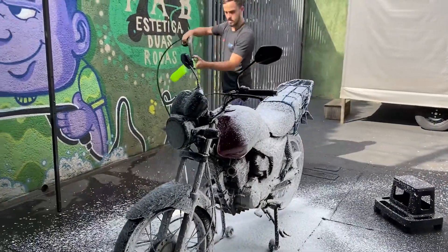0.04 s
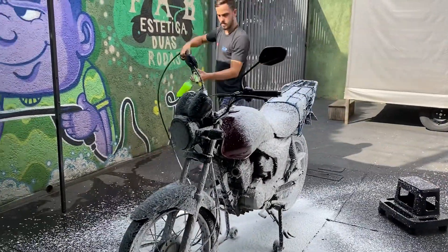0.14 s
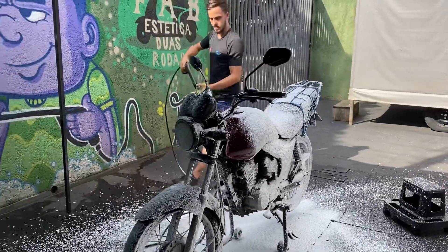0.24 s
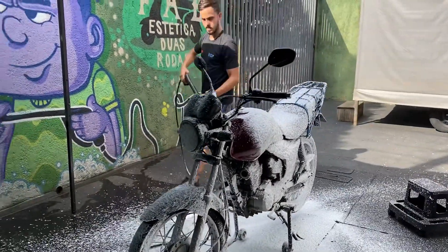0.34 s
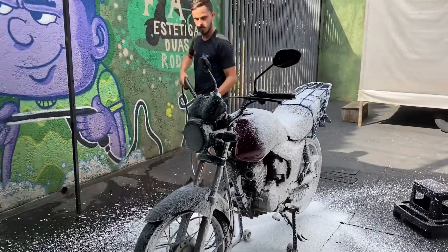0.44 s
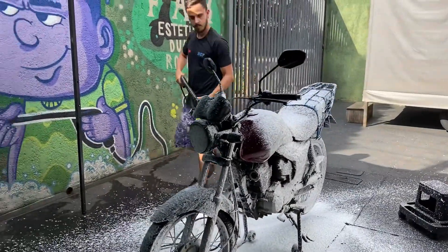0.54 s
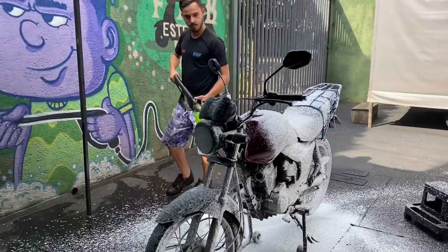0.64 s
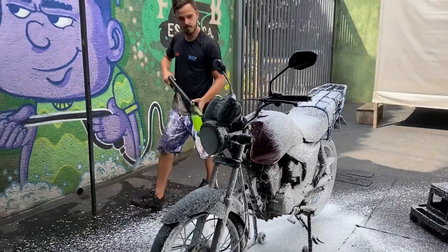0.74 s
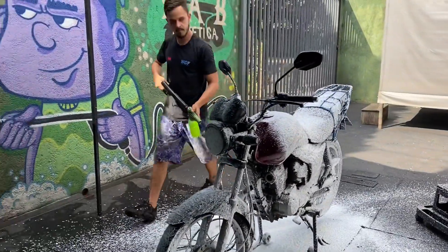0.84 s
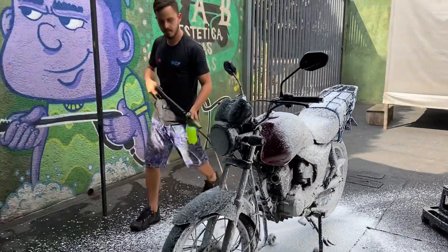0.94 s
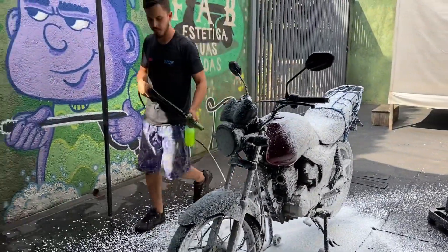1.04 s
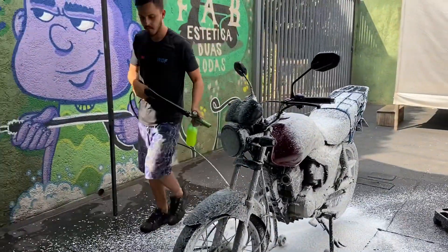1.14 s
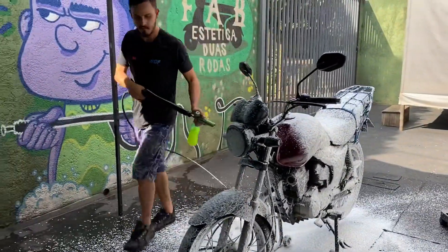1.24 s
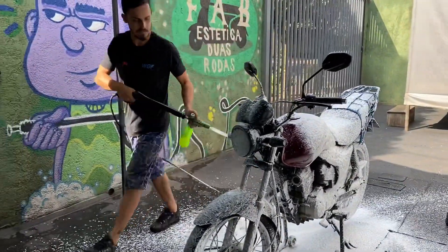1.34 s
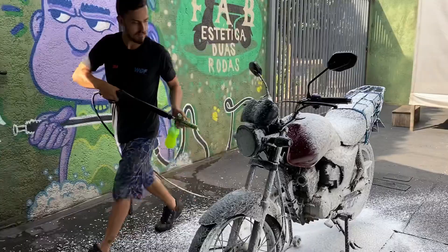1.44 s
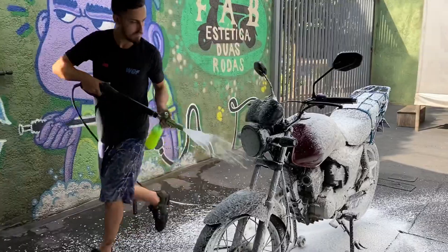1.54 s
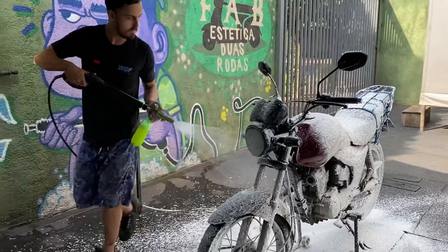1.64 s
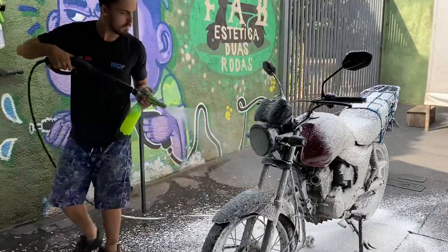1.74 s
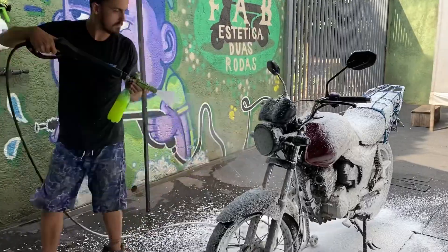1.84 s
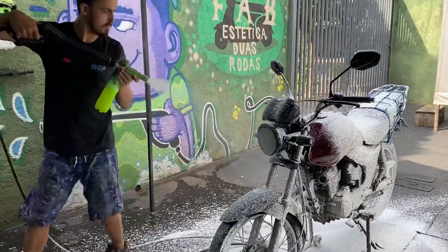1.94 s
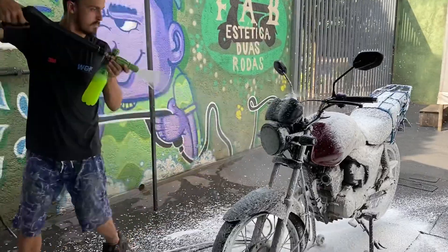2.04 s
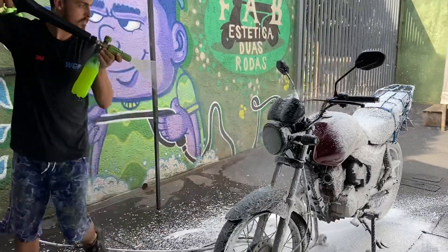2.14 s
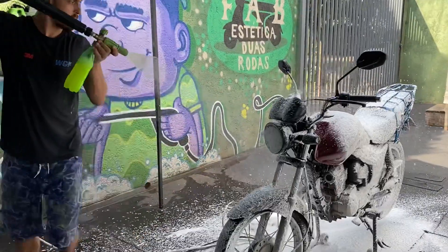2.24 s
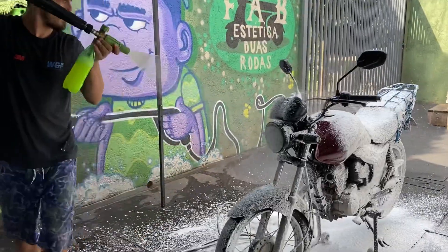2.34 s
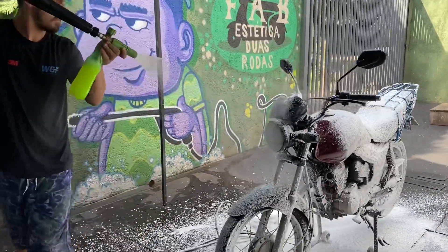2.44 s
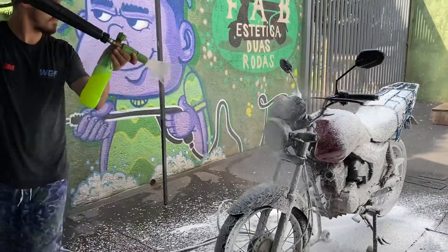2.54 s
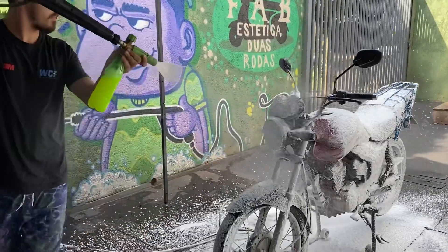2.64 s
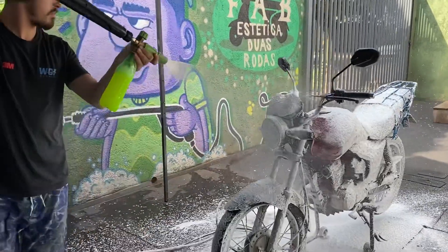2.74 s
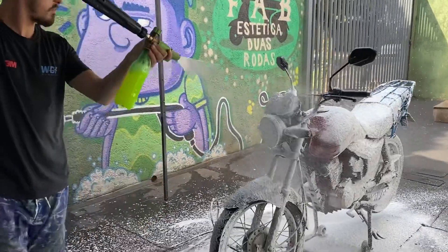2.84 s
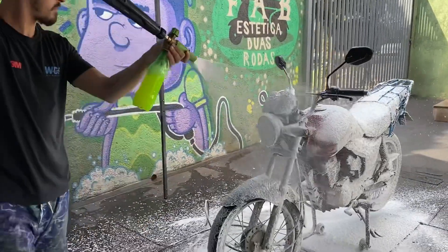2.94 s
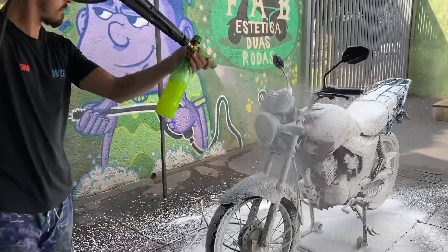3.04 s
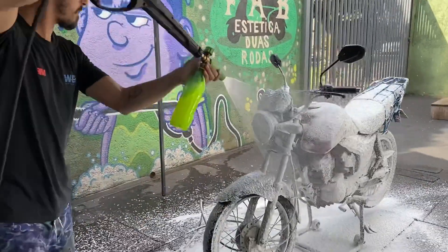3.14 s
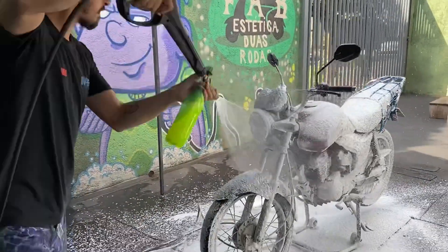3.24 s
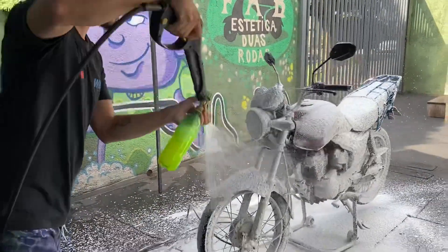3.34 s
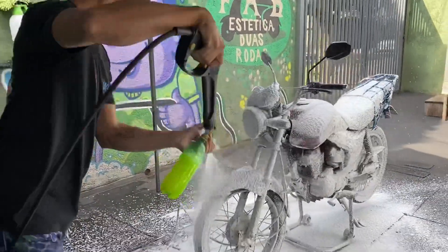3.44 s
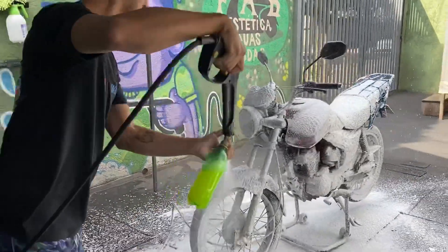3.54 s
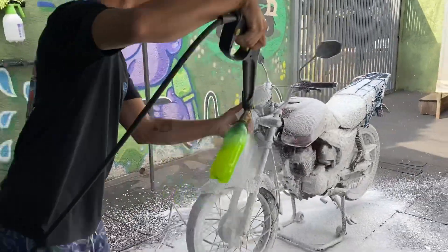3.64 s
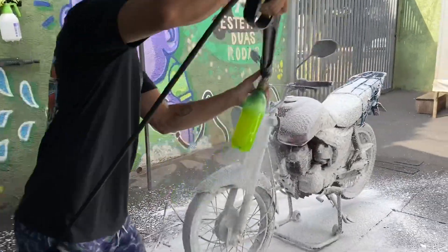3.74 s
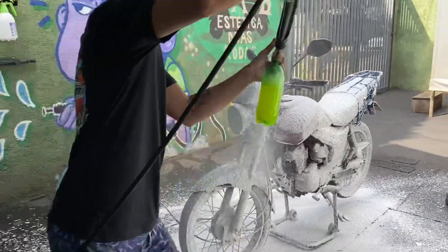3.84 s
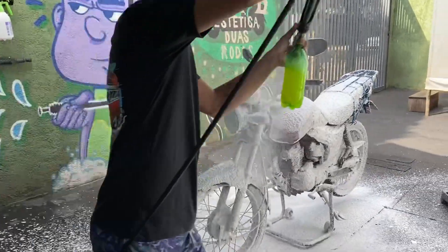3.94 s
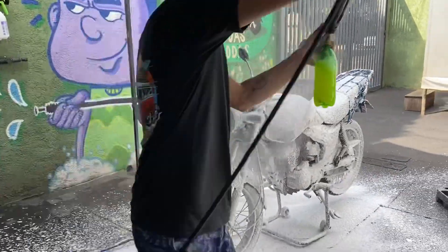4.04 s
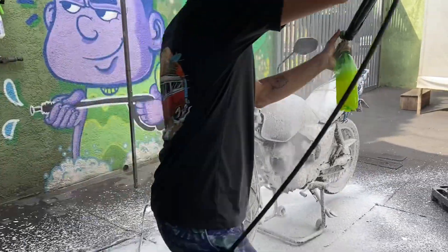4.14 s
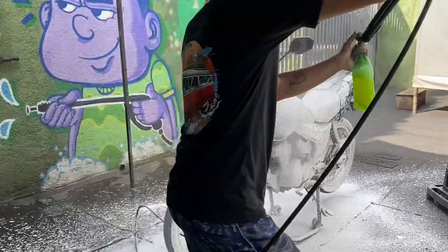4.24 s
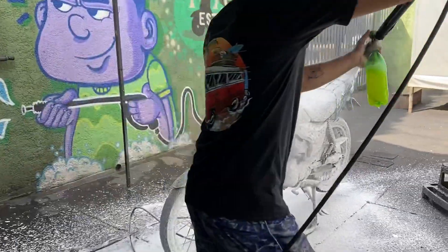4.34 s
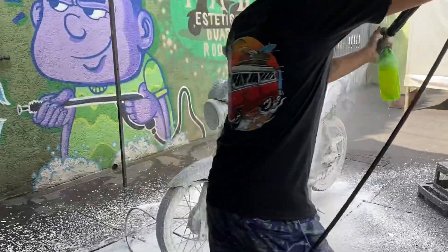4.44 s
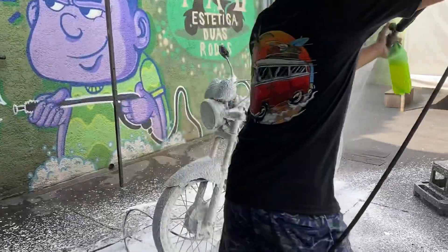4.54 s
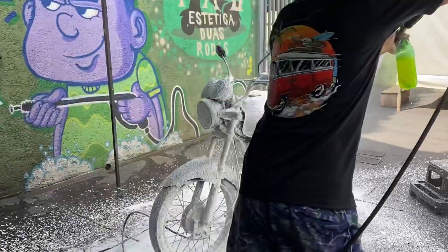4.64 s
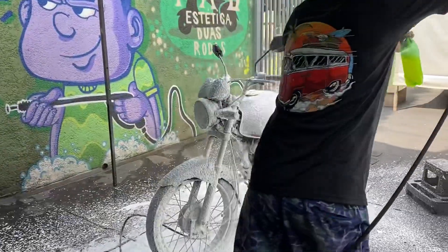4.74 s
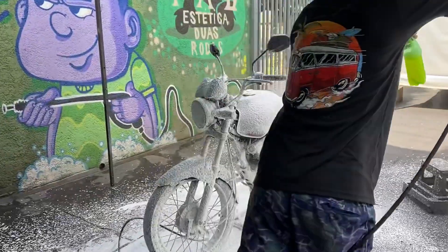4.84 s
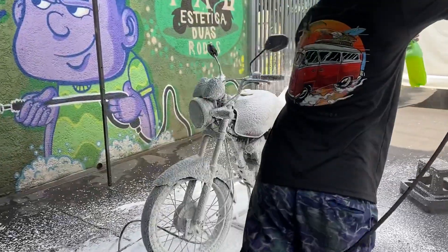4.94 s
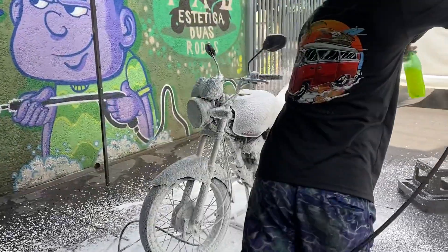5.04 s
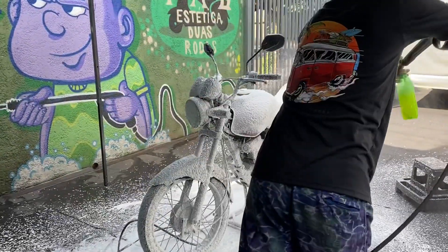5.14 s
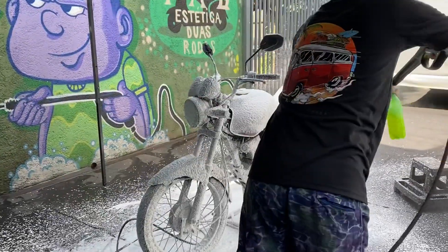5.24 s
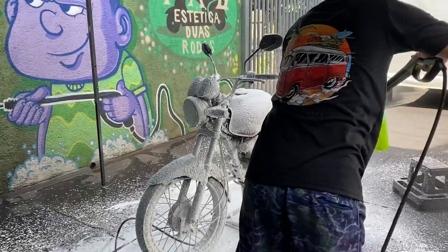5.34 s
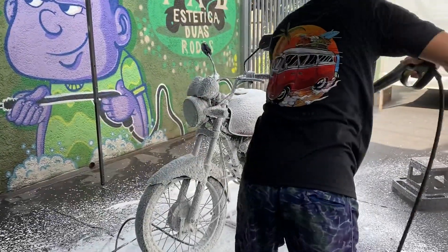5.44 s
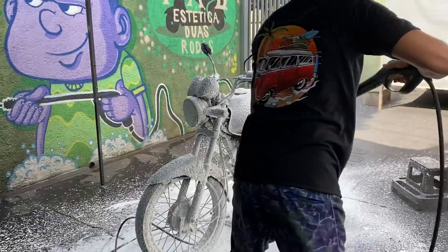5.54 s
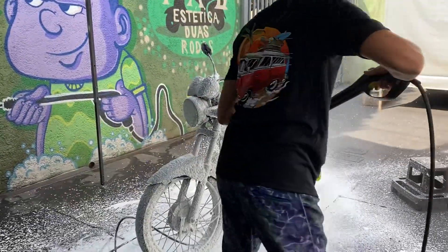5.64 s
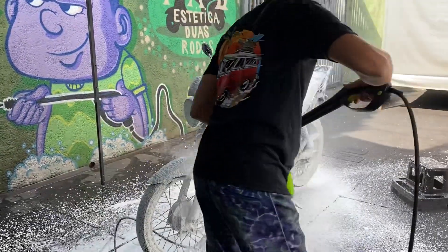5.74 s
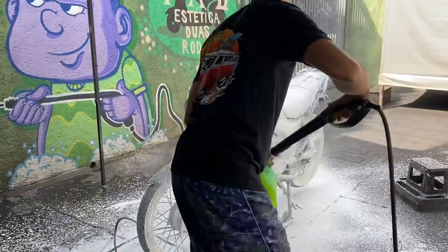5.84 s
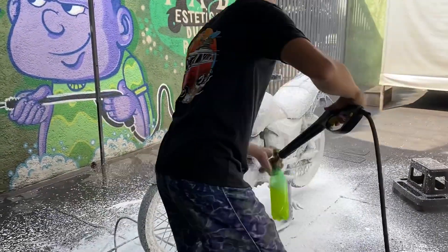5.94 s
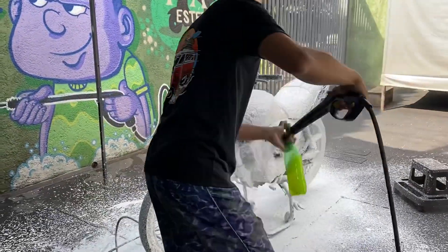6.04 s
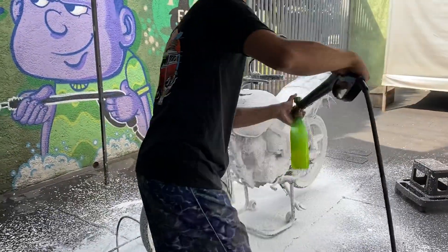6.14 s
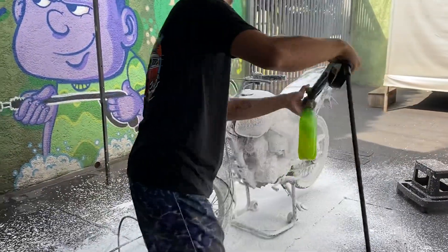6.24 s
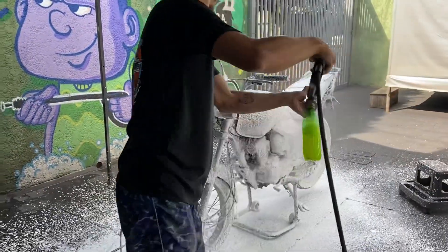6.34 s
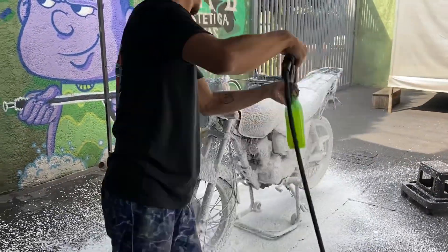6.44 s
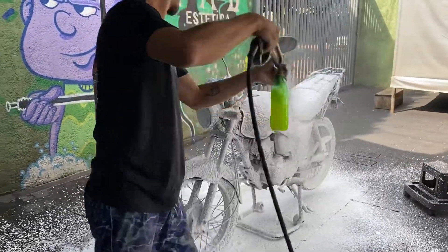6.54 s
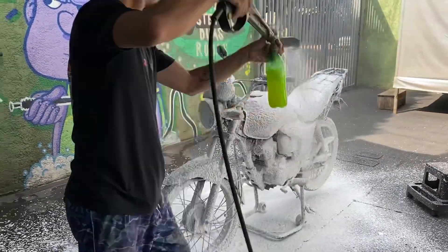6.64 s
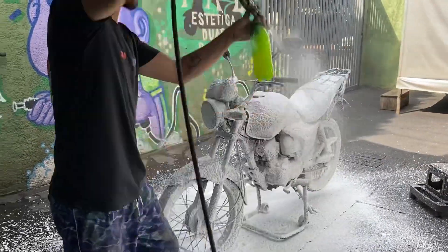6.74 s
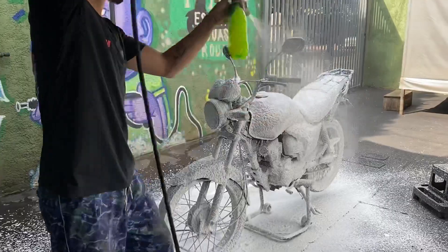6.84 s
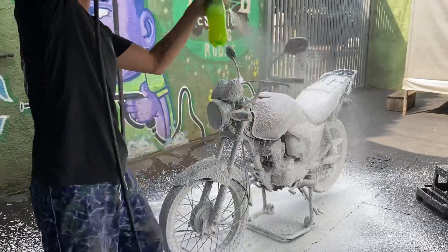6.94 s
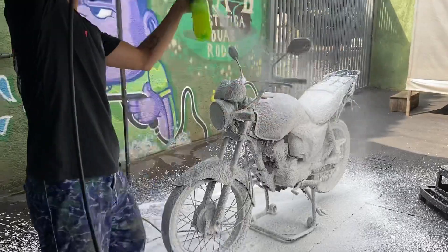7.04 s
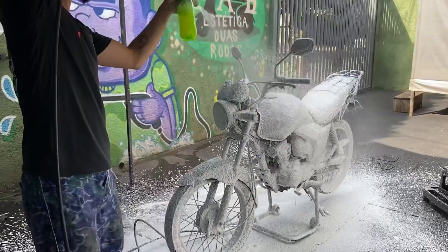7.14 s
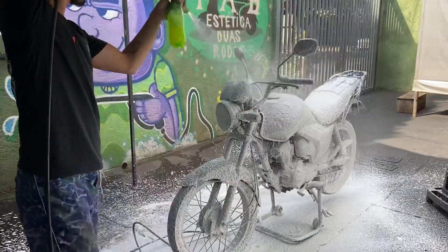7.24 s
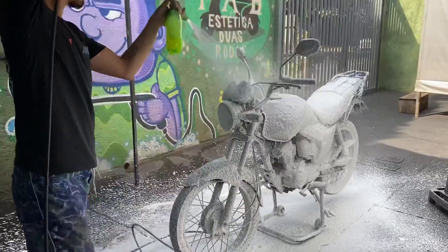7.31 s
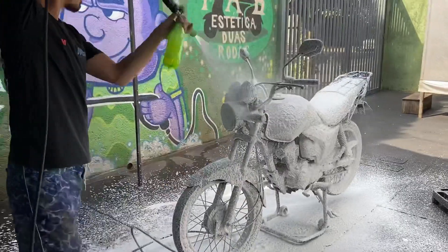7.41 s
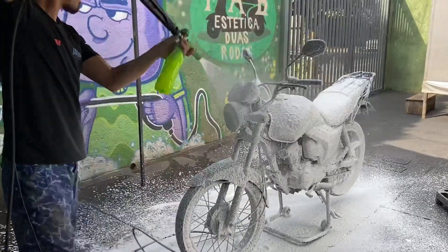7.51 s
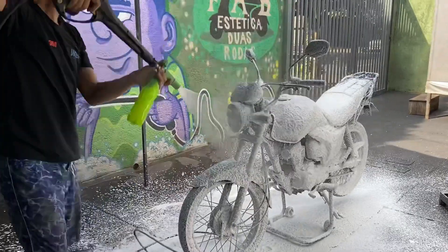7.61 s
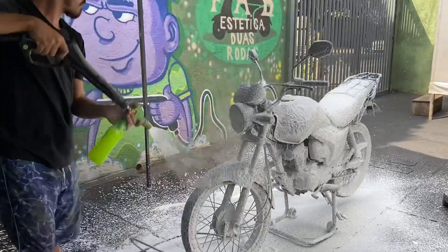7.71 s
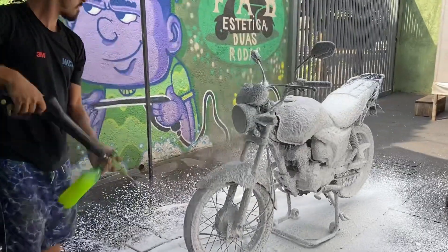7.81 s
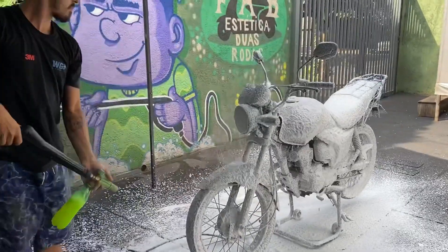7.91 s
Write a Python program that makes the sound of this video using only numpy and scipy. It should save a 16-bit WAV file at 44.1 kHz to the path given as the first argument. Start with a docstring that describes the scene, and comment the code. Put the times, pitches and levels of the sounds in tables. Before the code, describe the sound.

Soft steps and a trigger clack lead into an electric pressure washer buzzing steadily while foam hisses and splashes close by, then stops.

```python
"""An electric pressure washer in a roofed concrete yard. The echo of its last run dies away over distant
traffic, and a few soft steps scuff the wet ground. The trigger clacks, stored pressure vents, and the
motor hums up and takes the load: the pump drones and rattles while a foam lance hisses and splashes
close by. The drone changes colour as the listener moves. Near the end the trigger is let go, the valve
slams shut and the housing shudders as the motor cuts out."""
import sys
import numpy as np
from scipy import signal
from scipy.fft import rfft, irfft
from scipy.io import wavfile
from scipy.ndimage import uniform_filter1d

SR = 44100
rng = np.random.default_rng(int(sys.argv[2]) if len(sys.argv) > 2 else 0)


def bounce(signal):
    """Save signal as a 16-bit WAV file at the path given by the first command-line argument."""
    frames = np.transpose(np.atleast_2d(signal))
    limited = np.clip(frames, -1, 1)
    pcm = np.round(limited * 32767).astype(np.int16)
    wavfile.write(sys.argv[1], SR, pcm)


N = 351477
T = np.arange(N) / SR
FREQ = np.maximum(np.arange(N // 2 + 1) * SR / N, 1)
MOTOR_ON_S, LOADED_S, CUT_S = 1.457, 1.517, 7.835  # the motor starts, takes the load, is cut off

# reverb time of the yard (frequency [Hz], t60 [s])
ROOM_T60 = [(200, 1.04), (1000, 0.54), (4000, 0.79), (5500, 0.62), (12000, 0.39)]
# foam jet as lance and body move about (time [s], hiss [dB], brightness [dB])
JET_MOVES = [(1.75, -25, -3.5), (1.9, -25.5, -6.5), (2.38, -25.5, -4), (2.5, -24, -0.5), (2.68, -23.5, 0.5),
             (2.85, -23, 1.5), (3.16, -28, -3), (3.3, -25.5, -2.5), (3.93, -24.5, -3), (4.02, -28.5, -0.5),
             (4.22, -26, -3.5), (4.57, -31, -6.5), (4.94, -32, -3), (5.3, -33, -10), (5.6, -30.5, -5.5),
             (6.1, -28.5, -3.5), (6.5, -30.5, -8), (6.68, -32, -1.5), (7.02, -28.5, -1.5),
             (7.33, -23.5, 0.5), (7.6, -24.5, -1.5), (7.72, -27, -5), (7.82, -23.5, -3)]


def undb(db):
    """dB to gain."""
    return 10 ** (np.asarray(db) / 20)


def ramp(start_s, takes_s):
    """0 before, 1 after, straight between."""
    return np.clip((T - start_s) / takes_s, 0, 1)


def curves(table):
    """Columns of a time table, one value a sample."""
    times, *columns = np.transpose(table)
    return [np.interp(T, times, column) for column in columns]


def over_hz(table, hz=FREQ):
    """A (frequency [Hz], value) table read on a log axis."""
    freqs, values = np.transpose(table)
    return np.interp(np.log(hz), np.log(np.maximum(freqs, 1)), values)


def rms(x):
    """Average signal strength."""
    return np.sqrt(np.mean(x ** 2))


def bandpass(x, low_hz, high_hz):
    """Gently trim lows and highs."""
    return signal.sosfilt(signal.butter(2, [low_hz, high_hz], "band", fs=SR, output="sos"), x)


def walk(rate_hz):
    """Smooth random drift with a spread near 1."""
    hold = int(SR / rate_hz)
    levels = np.repeat(rng.standard_normal(N // hold + 1), hold)
    return 1.38 * uniform_filter1d(uniform_filter1d(levels, hold), hold)[:N]


def bands(noise, colour, flicker_db, rate_hz, octaves=1):
    """Colour noise and split it into bands that each flicker alone; returns (Hz, band) pairs."""
    spectrum = rfft(noise) * undb(over_hz(colour))
    norm = rms(irfft(spectrum, N))
    low_hz, high_hz = colour[0][0], colour[-1][0]
    layers = []
    for hz in low_hz * 2. ** np.arange(0, np.log2(high_hz / low_hz) + 1, octaves):
        share = np.cos(np.pi / 2 * np.clip(np.log2(FREQ / hz) / octaves, -1, 1)) ** 2
        layers.append((hz, undb(flicker_db * walk(rate_hz)) * irfft(spectrum * share, N) / norm))
    return layers


def dying_echo():
    """The last run rings out with a thin whistle: first in the yard, then in a larger space beyond."""
    # echo spectrum (frequency [Hz], level per Hz [dB])
    colour = [(150, -19), (300, -16.5), (380, -2), (620, -2), (1000, -5.5), (1600, -9.5), (2200, -16),
              (2700, -24), (3500, -22), (5000, -20.5), (7000, -27.5), (11000, -29.5), (16000, -36)]
    whistle_hz = 3230
    layers = bands(rng.standard_normal((2, N)), colour, flicker_db=2, rate_hz=14.1, octaves=0.522)
    whistle = undb(-24 + 4.7 * walk(9.5)) * np.sin(2 * np.pi * whistle_hz * T + 1.4 * walk(70.5))
    out = 0
    for hz, layer in layers + [(whistle_hz, whistle)]:
        decay_db = -60 * T / over_hz(ROOM_T60, hz)
        near, beyond = undb(decay_db), undb(-13 + decay_db / 3.2)
        out += layer * (near + beyond)
    return undb(-30.5) * out


def distant_traffic():
    """A bed of traffic rumble, with a machine humming far off."""
    # rumble spectrum (frequency [Hz], level per Hz [dB])
    colour = [(15, -33), (25, -44), (58, 8.5), (92, -7), (123, 7), (149, -8.5), (286, -10), (590, -29),
              (1080, -19), (2000, -33), (4000, -41), (8000, -54), (10400, -89), (17600, -120)]
    machine = undb(-62 + 2.3 * walk(9)) * np.sin(2 * np.pi * 120 * T + 0.6 * walk(8))
    rumble = bands(rng.standard_normal((2, N)), colour, flicker_db=1.5, rate_hz=8)
    return machine + undb(-53) * sum(band for _, band in rumble)


def footsteps():
    """Soles on wet concrete: a short knock under a scuff and a crunch of grit."""
    # a clink, then soft footfalls (time [s], level [dB], knock [Hz], scuff [dB], scuff top [Hz])
    footfalls = [(.533, -53, 2830, 0, 2500), (.861, -36, 282, -19, 1000), (.893, -45, 200, -9, 800),
                 (.937, -46, 420, -11, 1000), (1.04, -44, 437, -11.5, 700)]
    t, out = T[:SR // 5], np.zeros(N)
    for start_s, db, knock_hz, scuff_db, scuff_hz in footfalls:
        knock = np.sin(2 * np.pi * knock_hz * t) * np.exp(-t / 0.0067) * np.minimum(t / 0.002, 1)
        scuff = bandpass(rng.standard_normal(len(t)), scuff_hz / 3, 0.99 * scuff_hz)
        scuff *= np.exp(-t / 0.016) * np.minimum(t / 0.004, 1) / rms(scuff)
        grains = rng.standard_normal(len(t)) * undb(4 * rng.exponential(size=len(t)))
        grit = bandpass(grains, 3000, 12000)
        grit *= undb(-19) * np.exp(-t / 0.027) / rms(grit)
        at = int(start_s * SR)
        out[at:at + len(t)] += undb(db) * (knock + undb(scuff_db) * (scuff + grit))
    return out


def yard_reverb(x):
    """Diffuse stereo tail off walls and roof: decaying noise, shorter in the treble."""
    flat = [(60, 0), (16000, 0)]
    layers = bands(rng.standard_normal((2, N)), flat, flicker_db=0, rate_hz=5)
    tail = sum(band * undb(-60 * T / over_hz(ROOM_T60, hz)) for hz, band in layers)
    tail = tail * (T > 0.008) / np.sqrt(np.sum(tail ** 2) / 2)  # 8 ms pre-delay
    return signal.fftconvolve(x[None], tail[:, :2 * SR])[:, :N]


def trigger():
    """The lever's knock rings the gun's plastic body; the valve's bright snap follows."""
    # trigger pulled, then let go (time [s], level [dB])
    hits = [(1.347, -15.5), (7.833, -21)]
    # body resonances (frequency [Hz], level [dB], t60 [s])
    modes = [(466, -8, 0.03), (865, 10.5, 0.03), (1270, 7, 0.027), (1800, -5, 0.017), (2600, -1, 0.03),
             (3830, 1, 0.016), (5040, 1, 0.014)]
    snap_delay_s = 0.0045
    t, out = T[:SR // 5], np.zeros(N)
    body = sum(undb(db - 60 * t / t60) * np.sin(2 * np.pi * hz * t) for hz, db, t60 in modes)
    for start_s, db in hits:
        ticks = rng.standard_normal(len(t)) * np.exp(-t / 0.005)
        knock = signal.fftconvolve(ticks, body)[:len(t)]
        snap = 8.3 * np.roll(np.diff(ticks, prepend=0), int(snap_delay_s * SR))
        clack = bandpass(knock + snap, 300, 9000)
        at = int(start_s * SR)
        out[at:at + len(t)] += (undb(db) * clack / np.abs(clack).max())[:N - at]
    return out


def surge_gain(layer):
    """Envelope of the pressure surges in one layer: fast attack, exponential decay."""
    # pressure vents, the motor jolts the hose, the valve slams shut, the housing shudders out
    # (time [s], t60 [s], housing boom [dB], valve rattle [dB], hiss [dB])
    surges = [(1.348, 0.31, -31, -24, -34.5), (1.468, 0.25, -38, -50.5, -45),
              (7.834, 0.28, -23.5, -21, -21), (7.875, 0.67, -26, -29.5, -51)]
    column, attack_s = ["boom", "rattle", "hiss"].index(layer), 0.011
    gain = 0
    for peak_s, t60, *levels_db in surges:
        decay_db = -60 * np.maximum(T - peak_s, 0) / t60
        gain += ramp(peak_s - attack_s, attack_s) * undb(levels_db[column] + decay_db)
    return gain


def pumping_gain(build_s, from_db, release_t60_s=0.22):
    """Envelope that climbs as the pump takes the load and dies after the cut."""
    build_db = from_db * (1 - ramp(LOADED_S, build_s))
    release_db = -60 * np.maximum(T - CUT_S, 0) / release_t60_s
    return (T > MOTOR_ON_S) * undb(build_db + release_db)


def valve_rattle(turn):
    """Valve noise booms through the housing, puffing once a turn and for each of three pistons."""
    # rattle spectrum (frequency [Hz], level per Hz [dB])
    colour = [(40, -15.5), (100, -19), (200, -7.5), (300, -10), (400, -5.5), (520, 2), (700, -2.5),
              (1150, -5), (1450, -1), (1750, -11), (2200, -6), (2700, -10), (3300, -13.5), (5000, -14.5),
              (8000, -66)]
    puff = 1 + (T > MOTOR_ON_S) * (0.13 * np.cos(turn - 0.6) + 0.17 * np.cos(3 * turn))
    hiss_db = curves(JET_MOVES)[0]
    shade = undb(0.34 * (hiss_db - hiss_db.max()))  # what shades the jet also shades the upper rattle
    boom = np.hypot(surge_gain("boom"), undb(-27.5) * pumping_gain(build_s=0.049, from_db=-9))
    upper = np.hypot(surge_gain("rattle"), undb(-27) * shade * pumping_gain(build_s=0.049, from_db=-19))
    layers = bands(puff * rng.standard_normal((2, N)), colour, flicker_db=1, rate_hz=7, octaves=0.485)
    return sum(band * (boom if hz < 700 else upper) for hz, band in layers)


def foam_jet():
    """Foam tears into droplets: hiss with bursting bubbles, brighter when the lance points closer."""
    # hiss spectrum (frequency [Hz], level per Hz [dB])
    colour = [(1000, -28), (2000, -1), (3200, -6), (4500, -3.5), (6000, -1), (8000, 0.5), (12000, 0),
              (16000, -3.5)]
    # the jet sweeps over a hard edge (time [s], boost [dB], length [s])
    splashes = [(2.03, 2, .06), (2.211, 1.5, 0.073), (3.23, 2, 0.048), (3.508, 2, 0.066), (4.296, 1, 0.13),
                (5.597, 2.5, 0.046), (5.886, 6, 0.12), (6.012, 3.5, 0.052), (6.274, 5, 0.084),
                (6.572, 4.5, 0.072), (6.763, 9, 0.18), (7.058, 0.5, 0.031)]
    hiss_db, bright_db = curves(JET_MOVES)
    splash_db = sum(db * np.exp(-((T - at_s) / (length / 2)) ** 2) for at_s, db, length in splashes)
    spray = undb(hiss_db + 0.87 * walk(26) + splash_db) * pumping_gain(build_s=0.18, from_db=-20.5)
    fizz = undb(-75.5)  # foam settling on the ground
    gain = fizz + np.hypot(surge_gain("hiss"), spray)
    bubbles = rng.standard_normal((2, N)) * undb(2 * rng.exponential(size=(2, N)))
    layers = bands(bubbles, colour, flicker_db=0.98, rate_hz=9, octaves=0.48)
    return gain * sum(undb(bright_db * np.clip(np.log2(hz / 6000), -0.5, 1.2)) * band
                      for hz, band in layers)


def motor_hum():
    """The stator pulls at twice the mains rate; its overtones growl on the inrush current."""
    # hum partials (frequency [Hz], level [dB])
    partials = [(120, 0), (240, -6), (360, -11)]
    inrush_db = 2.5 * ramp(MOTOR_ON_S + 0.015, 0.01) * (1 - ramp(LOADED_S, 0.08))
    tone = sum(undb(db + 0.22 * walk(4) + (hz > partials[0][0]) * inrush_db) * np.sin(2 * np.pi * hz * T)
               for hz, db in partials)
    level_db = -42 - 9 * (1 - ramp(MOTOR_ON_S, 0.09)) - 224 * np.maximum(T - CUT_S, 0)
    pan_db = np.array([[1], [-1]])
    return np.sqrt(2) * tone * undb(level_db + pan_db) * (T > MOTOR_ON_S)


def pump_drone(turn):
    """Each shaft turn knocks the housing; standing waves remix its harmonics as the listener moves."""
    # shaft harmonics (order, then for each of three places: left [dB], right [dB], left lead [rad])
    orders = [(3, -55, -52.5, 0, -46, -47, -0.5, -44.5, -46.5, 0.05),
              (4, -49, -52, 1, -51, -51, -1, -49, -50.5, 0.5),
              (5, -39, -46, -1, -42, -65.5, 2.5, -42.5, -47.5, 1),
              (6, -37.5, -40, 0.5, -46, -47, 1.5, -54, -53, 0.1),
              (7, -28, -27, 0.5, -25.5, -27, -0.6, -24.5, -39.5, -1),
              (8, -28, -29.5, 0.85, -30, -48, 1.6, -34.5, -36.5, 3),
              (9, -34.5, -30, 0, -27, -32.5, 0.5, -27.5, -30, 1.66),
              (10, -33.5, -47, 2.5, -29, -27.5, 1.5, -28.5, -31, 1.09),
              (11, -29.5, -32.5, -2.5, -32.5, -30, 1.5, -27, -28.5, 1.44),
              (12, -29, -38, 1, -34, -32, 3, -43, -46, 3.0),
              (13, -32, -32.5, -2.5, -41, -29.5, 0.5, -26.5, -43.5, 2),
              (14, -31.5, -49, 0.5, -39, -41, 0, -36, -47, 3.0),
              (15, -38, -34.5, -0.5, -37, -37, -2.5, -42, -44, 0.34),
              (16, -35, -49, 2, -36.0, -41, 0.7, -38.5, -43.5, 1.5),
              (17, -29.5, -28.5, 0, -40.5, -38, -1.5, -38.0, -43, 1),
              (18, -36, -43, -0.5, -39, -53.0, -3.5, -52, -39.5, -2.5),
              (19, -35.5, -48, 1, -41, -38, 0, -39, -39.5, 1.83),
              (20, -38, -42, 0.5, -37, -55, 3, -48.5, -66.0, 4),
              (21, -39.5, -37, 0.5, -41, -50, 0, -48, -48.5, -0.6),
              (22, -42, -42, 1.4, -40, -44, -0.93, -34.5, -47, 2.0),
              (23, -37.5, -46, -1, -51, -52.5, 4, -56, -51, 2),
              (24, -36, -32.5, 3, -46.0, -43, 1.0, -46, -55, 4.5),
              (25, -38, -38.5, 4.5, -50, -47, -1.24, -41, -34.5, 2.13),
              (26, -45, -35, -1, -42.5, -44, 3, -35.0, -35, 1.84),
              (27, -36, -35.5, 1, -37.5, -39, -5.5, -47, -42.5, -1.5),
              (28, -42, -45, 1.7, -44, -54, -2, -50, -53, 0.5),
              (29, -45, -38, -1, -40, -34.5, -2, -36, -35.5, 2),
              (30, -47, -50.5, 0, -41, -46, 0, -51, -46, -4.5),
              (31, -42, -42, -4, -48.5, -39, 3.5, -50.5, -41.5, 1.0),
              (32, -42.5, -39.5, -3.0, -47, -47.0, -2, -60, -61, 3.5),
              (33, -47.0, -61.0, -3, -43.0, -52, 0.5, -53, -52.0, -2.5),
              (34, -40, -45, 1, -42, -39, -1, -54, -47.5, -0.5),
              (35, -53.5, -52, -1.5, -38, -44, 0.5, -46.5, -38.5, 1),
              (36, -54, -52, 2, -49, -41, -1, -51, -54, -0.5),
              (37, -41.0, -38, -3.5, -51, -48, 0, -41.5, -42.5, -2.5),
              (38, -45, -40, 1.7, -40, -40, 1.5, -61, -52, -3),
              (39, -52, -48, 0.45, -51.5, -56.0, -1, -48, -50, -1),
              (40, -52, -58.0, -2, -40, -41, 1, -41.5, -47, 0.9),
              (41, -42, -46, 0, -55, -50, 4, -67, -69, 6),
              (43, -52.5, -50, -0.5, -47, -45, 0, -53.5, -54, 0.5),
              (44, -51, -48.0, -1.5, -56.5, -53.0, 1, -55, -54, 0),
              (48, -56.0, -59.0, -0.1, -49.0, -52, 0, -52, -49, 0.1),
              (55, -58.0, -52.5, 1.1, -54.0, -52.5, -1, -52.5, -54, 0.7),
              (58, -58.0, -64.0, 0.9, -54.5, -61, -2, -51.5, -50.5, 0.8),
              (60, -45, -45, 1.2, -49, -48, 0, -46, -51.5, 2.2)]
    # the listener leaves, passes, arrives (time [s])
    places_s = [2.24, 2.98, 3.69]
    # the loudest harmonics (order)
    loud_orders = [7, 8, 9, 10, 11, 13]
    # they swell and dip as the washer's body shades the listener (time [s], level of each [dB])
    swells = [(1.6, 1, -2, 2, 4, 0, 3), (2.1, 1, 0.5, -2, -5, -1, 1), (2.6, 2.5, 2, 3.5, 5.5, 2, -12.5),
              (3.0, 0.5, 0, -1, 1, -1, 0), (3.35, -0.5, -4, -2, 0, -2, 0.5),
              (3.75, 0.5, 3.5, -1.5, -0.5, -2, 3), (4.15, 0.5, 1.5, -3.5, 2, -0.5, -0.5),
              (4.6, -2.5, 1, 1, -0.5, -0.5, 2.5), (5.0, -4.5, -3, -0.5, -6, 0.5, 0.5),
              (5.35, -4, -7, 2, -2.5, 1.5, 2), (5.75, -5.5, -8, 1.5, 3, 1.5, -1.5),
              (6.15, -3.5, -1, -3, -1, 1, -1), (6.55, 2, -11, -0.5, 0, 0.5, 0.5),
              (6.95, 2.5, -3, -3, 0.5, -1, 1.5), (7.35, 0.5, 0, 3, -2, 2, 1), (7.8, 2, 3, 0, -4, -1.5, 0.5)]
    # level ride of the upper harmonics (time [s], level [dB])
    whine = [(1.6, -2), (2.2, -0.5), (2.8, 0), (3.4, -1), (3.9, 1), (4.5, -0.5), (5.1, -2), (5.7, 1),
             (6.2, 1), (7.0, 1.5), (7.8, 1.5)]
    whine_from_order, ring_order, ring_width = 14, 11.15, 3.33
    light_db = -22 * (1 - ramp(LOADED_S, 0.09))  # running light before the load
    # the last strokes arrive just after the cut, then the shaft runs down
    coast_db = -9 * ramp(CUT_S + 0.011, 0.026) - 40 * np.maximum(T - CUT_S, 0)
    crossfades = np.array([np.interp(T, places_s, place) for place in np.eye(len(places_s))])
    near = 1 - ramp(places_s[0], places_s[-1] - places_s[0])
    whine_db, swells_db = curves(whine)[0], dict(zip(loud_orders, curves(swells)))
    out = 0
    for order, *by_place in orders:
        left_db, right_db, lead = np.reshape(by_place, (len(places_s), -1)).T
        size = np.sqrt(undb([left_db, right_db]) ** 2 @ crossfades)
        phasor = size * np.exp(0.5j * np.outer([1, -1], np.unwrap(lead) @ crossfades))
        phasor *= np.exp(-1j * near * np.angle(phasor.sum(axis=0)))  # close by, all land as one knock
        # echoes off moving bodies make each harmonic swell slowly and tremble in level and phase
        swell = undb(swells_db.get(order, whine_db * (order >= whine_from_order)) + 1.1 * walk(2.59))
        depth, rate_hz = (1 + 0.77 * near) * (0.085 + 0.0051 * order), 8 + 0.3 * order
        tremble = 1 + depth * np.array([walk(rate_hz) + 1j * walk(rate_hz) for _ in range(2)])
        # the walls scatter the phases and the ringing housing drags them, more so from farther off
        scatter = 0.013 * order ** 2 * rng.standard_normal()
        drag = 3.01 * np.arctan((order - ring_order) / ring_width)
        phase = order * turn + (scatter - drag) * (1 - 0.52 * near)
        out += np.real(swell * tremble * phasor * np.exp(1j * phase))
    return np.sqrt(2) * out * undb(light_db + coast_db - 0.07) * ramp(MOTOR_ON_S + 0.012, 0.02)


def stereo_image(pair):
    """Two sound fields become left and right: partly alike, tilted, one side ahead of the other."""
    # how alike the sides are (frequency [Hz], likeness [0-1])
    likeness = [(30, .99), (140, .98), (200, .8), (500, .5), (1400, .4), (3000, .6), (6000, .55),
                (7500, .89), (16000, .87)]
    # balance (frequency [Hz], left minus right [dB])
    tilt = [(60, 1), (110, 0), (200, 2.5), (380, 0), (700, 5), (1290, -1.5), (2380, 0), (4400, 0),
            (8120, 1), (15000, 0.5)]
    # phase between the sides (frequency [Hz], left lead [rad])
    lead = [(0, 0), (950, 1.1), (1380, 2.1), (1890, 0.2), (3270, 0.5), (7490, -0.1), (8350, -2.8),
            (9560, -3.3), (10400, -6.1), (11600, -6.3), (12500, -9.2), (13700, -9.4), (14600, -12.5),
            (16500, -12.6)]
    left, other = rfft(pair)
    alike, pan = over_hz(likeness), undb(over_hz(tilt) / 2)
    right = (alike * left + np.sqrt(1 - alike ** 2) * other) * np.exp(-1j * over_hz(lead))
    return irfft([left * pan, right / pan], N)


def scene():
    """Mix yard, steps, gun, jet and machine; one shaft drives both rattle and drone."""
    # shaft speed (time [s], speed [turns/s])
    shaft = [(1.44, 52.5), (1.55, 55.4), (1.6, 55.9), (1.75, 55.3), (2.5, 55.27), (3.3, 55.36),
             (7.84, 55.36), (7.97, 54)]
    turn = 2 * np.pi * np.cumsum(curves(shaft)[0]) / SR
    clacks, feet = trigger(), footsteps()
    field = dying_echo() + valve_rattle(turn) + foam_jet() + distant_traffic() + clacks + feet
    reverb = yard_reverb(undb(-1.5) * clacks + undb(-6.5) * feet)
    return stereo_image(field + reverb) + pump_drone(turn) + motor_hum()


def record(dry):
    """A steep low-pass takes off the very top."""
    return signal.sosfilt(signal.ellip(10, 0.2, 80, 15750, fs=SR, output="sos"), dry)


dry = scene()
out = record(dry)
bounce(out)
```